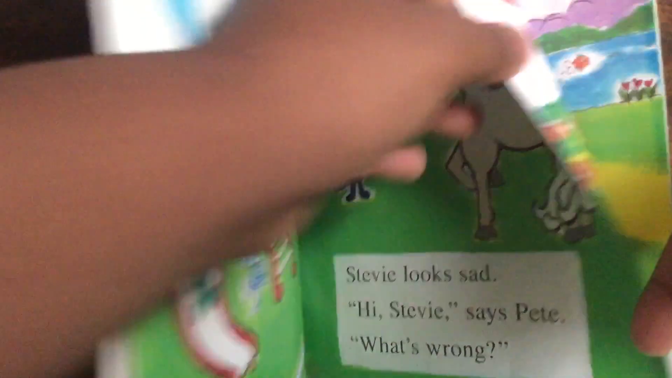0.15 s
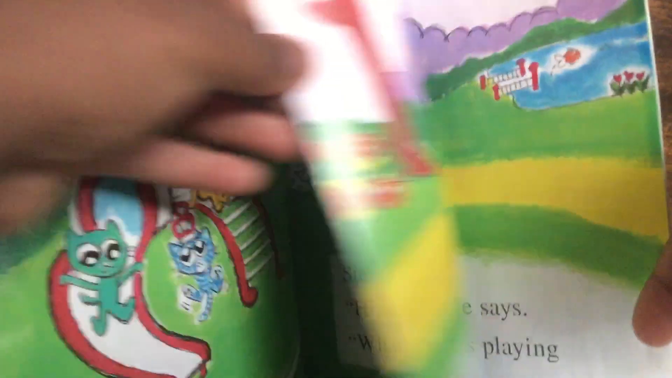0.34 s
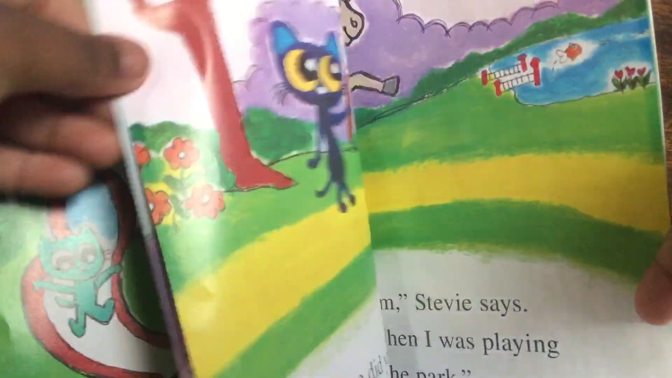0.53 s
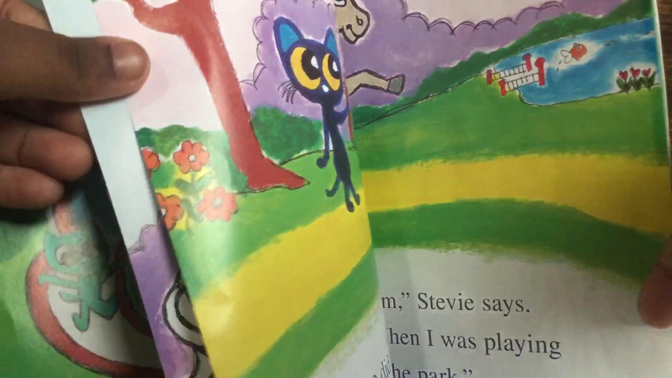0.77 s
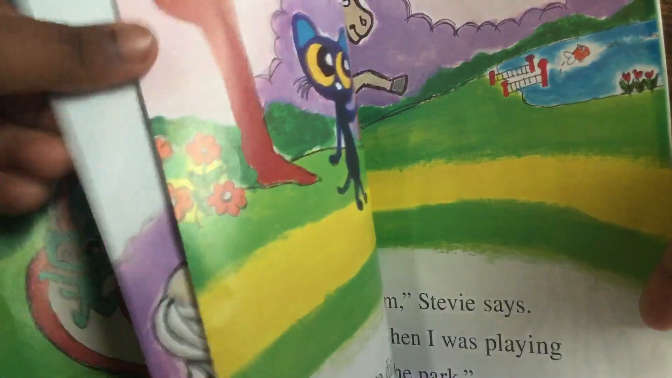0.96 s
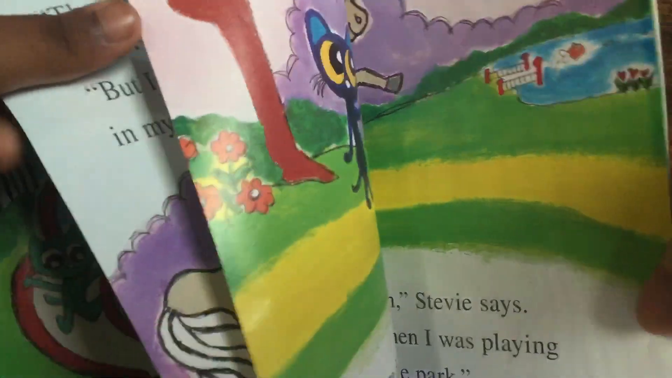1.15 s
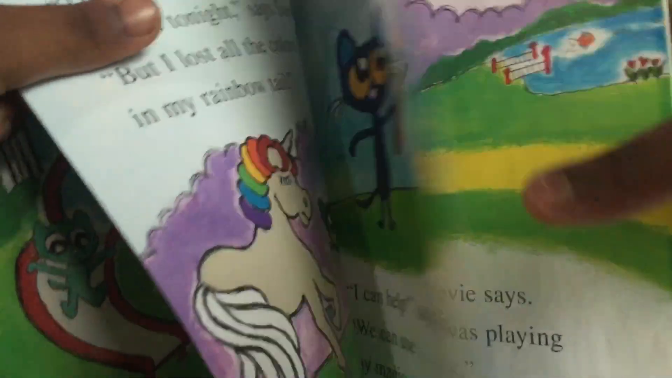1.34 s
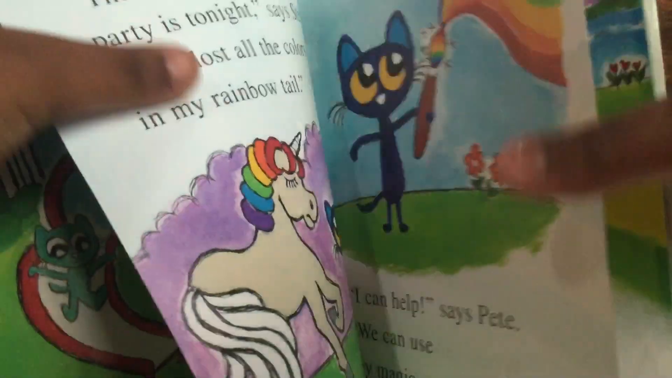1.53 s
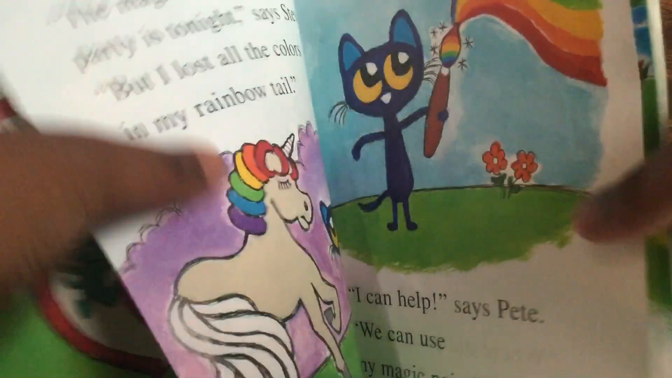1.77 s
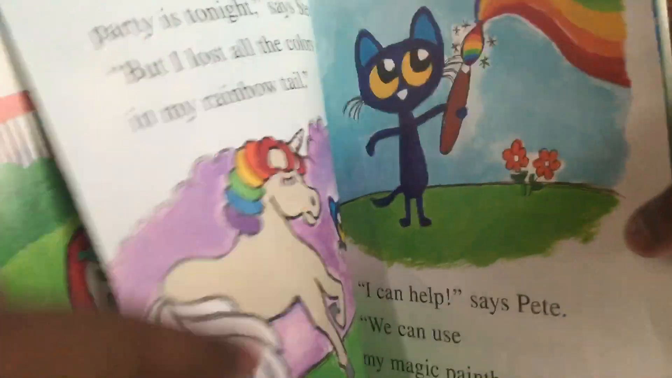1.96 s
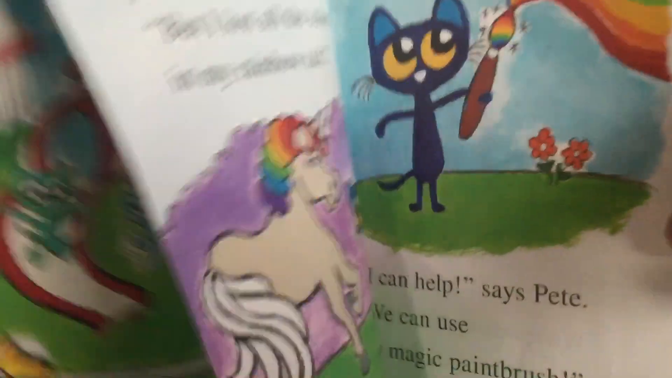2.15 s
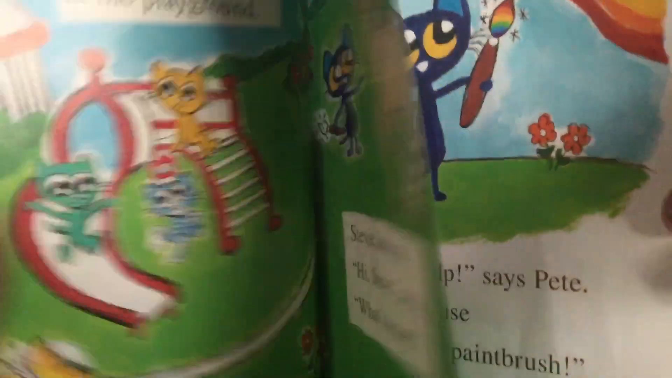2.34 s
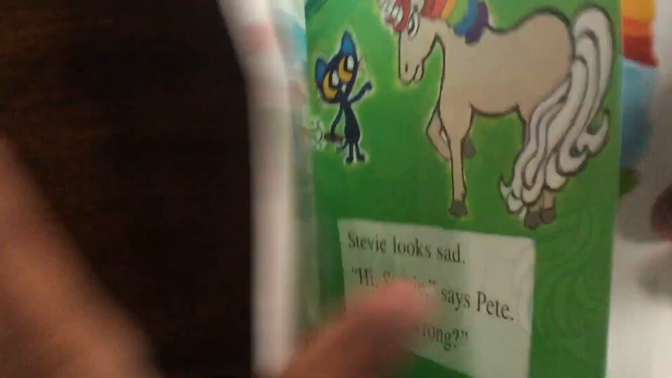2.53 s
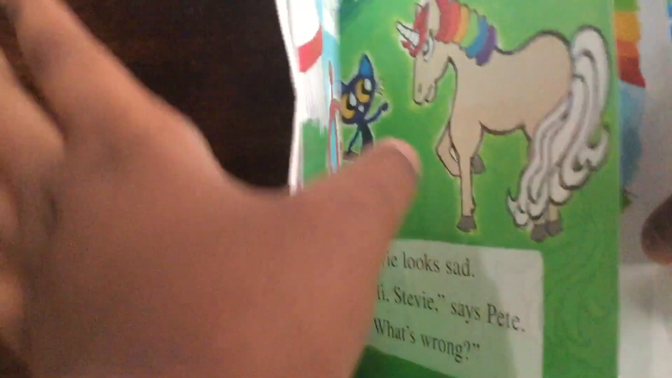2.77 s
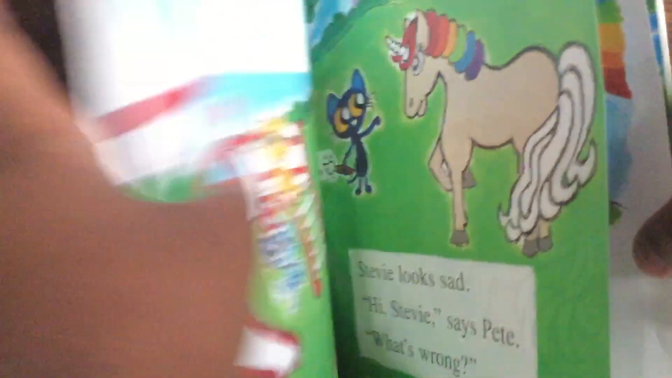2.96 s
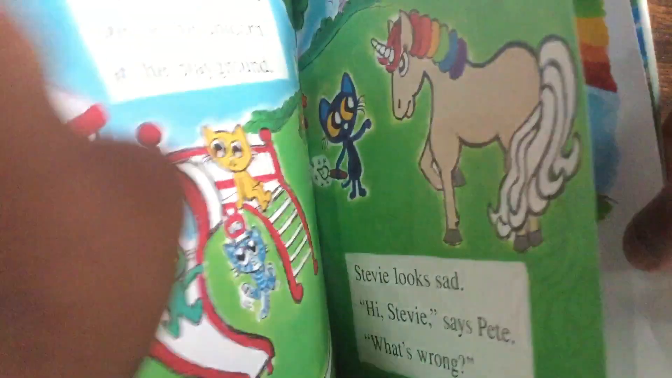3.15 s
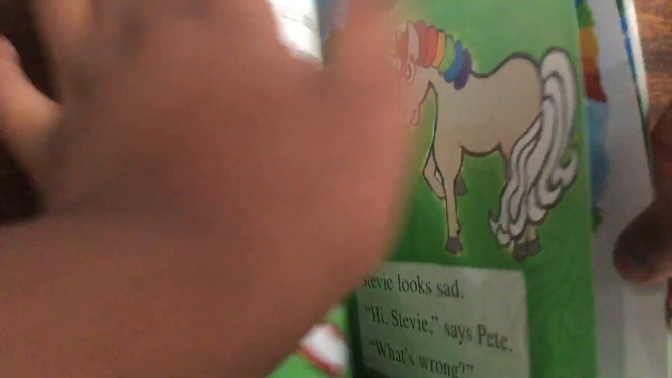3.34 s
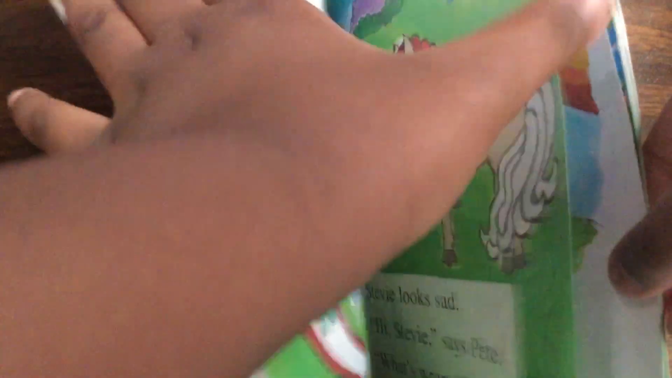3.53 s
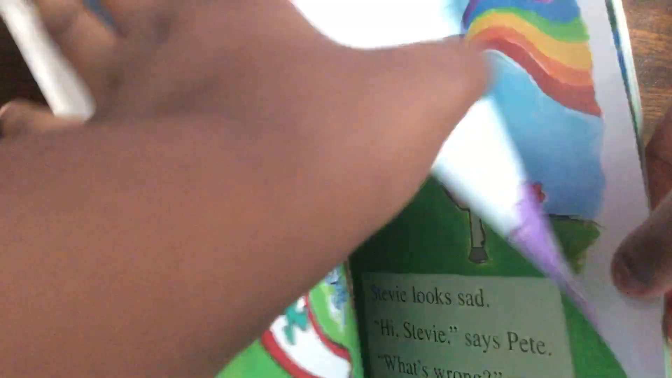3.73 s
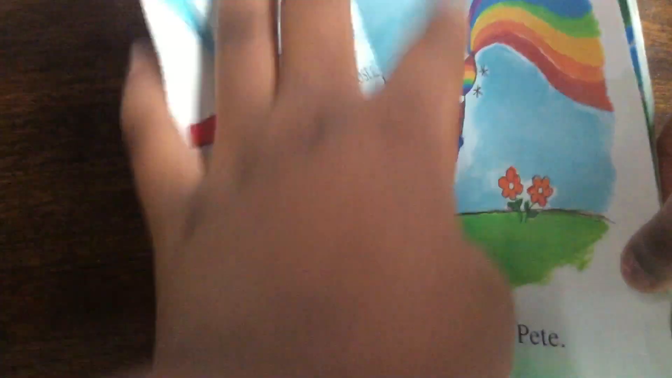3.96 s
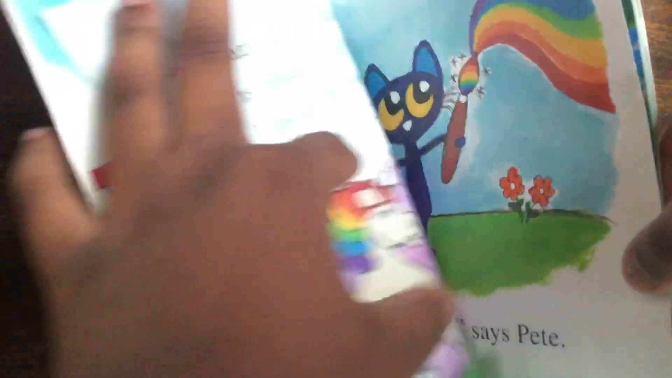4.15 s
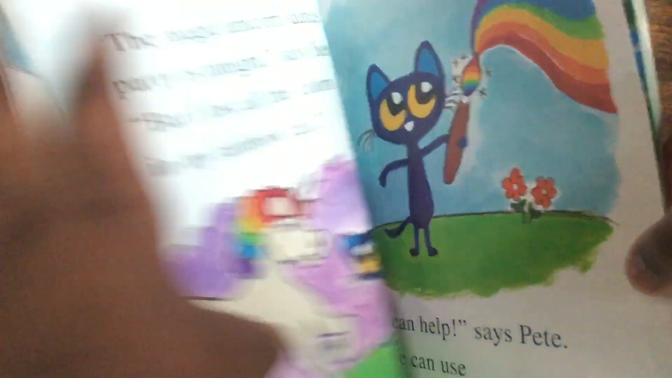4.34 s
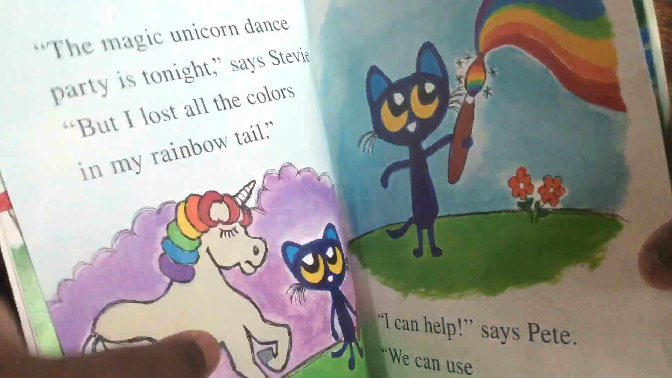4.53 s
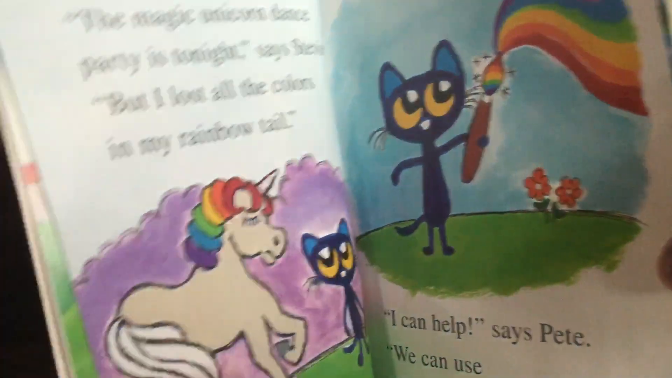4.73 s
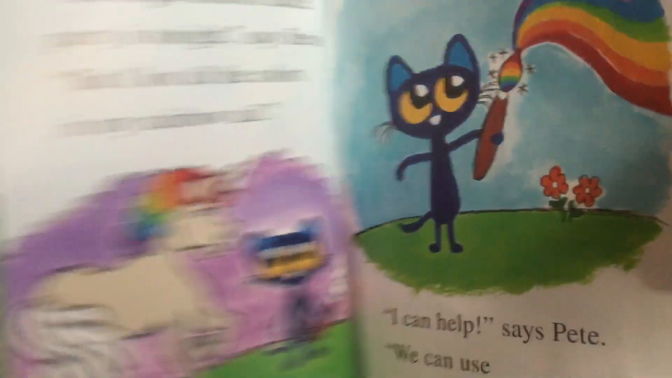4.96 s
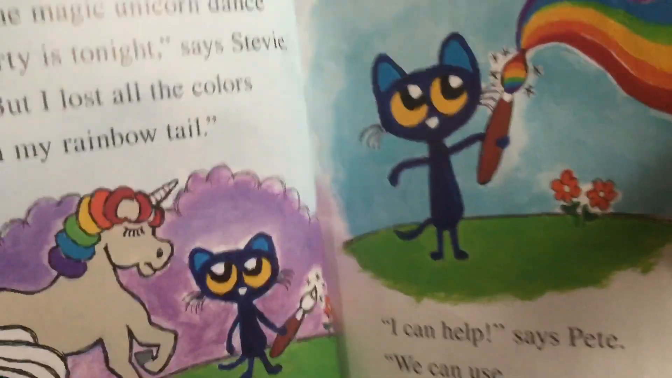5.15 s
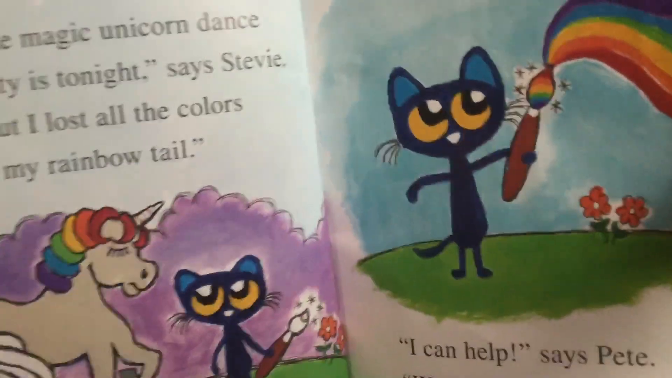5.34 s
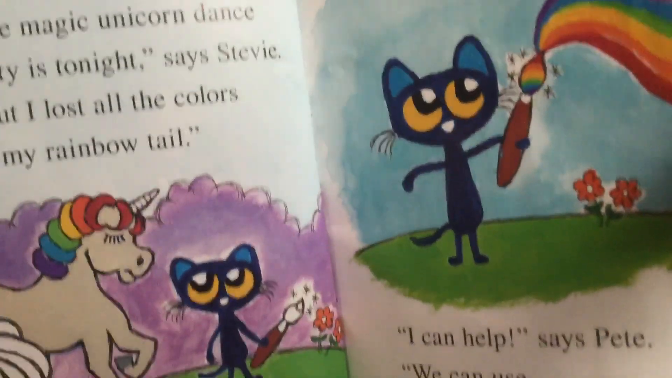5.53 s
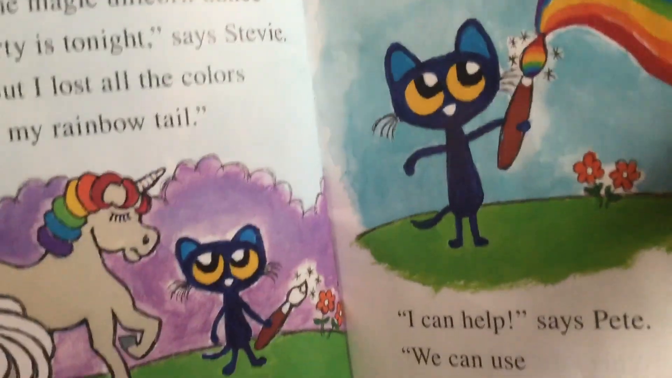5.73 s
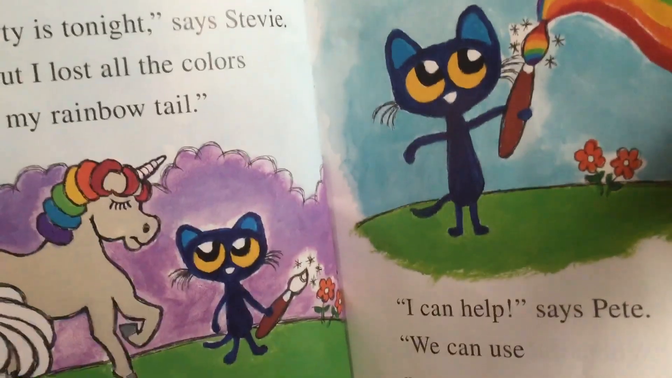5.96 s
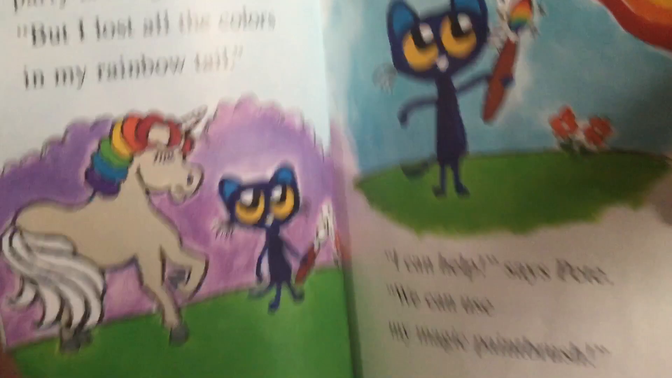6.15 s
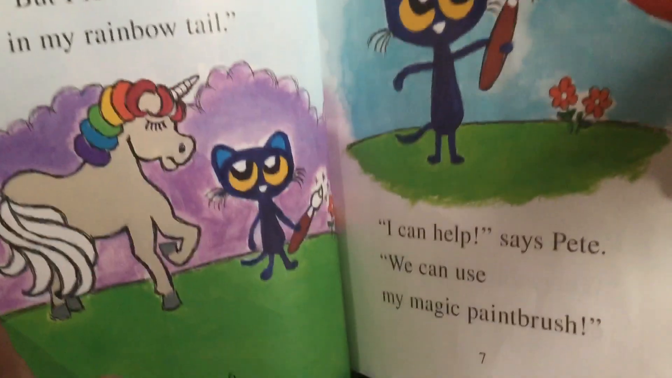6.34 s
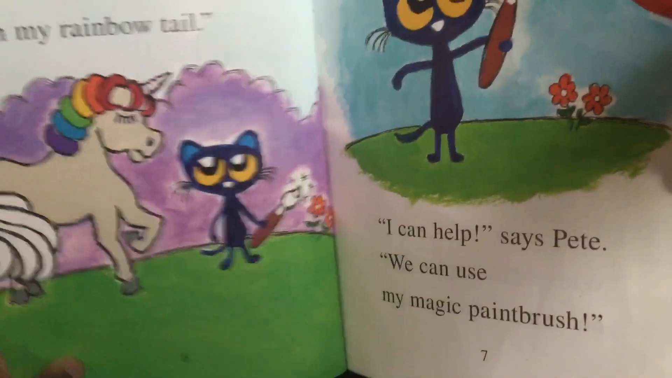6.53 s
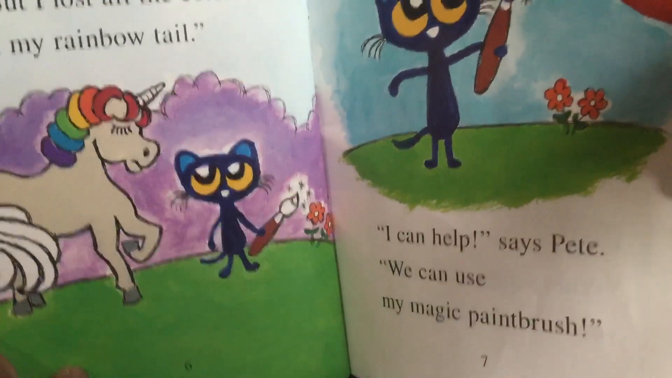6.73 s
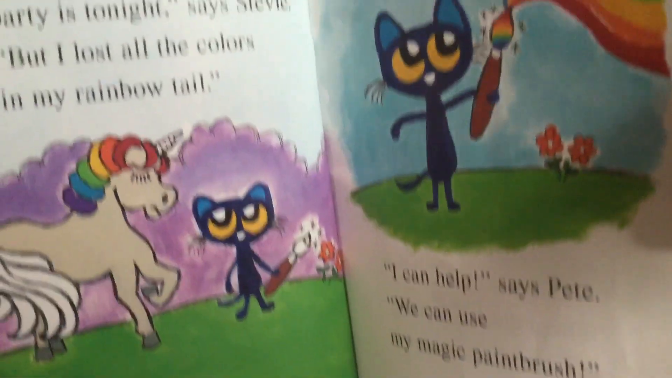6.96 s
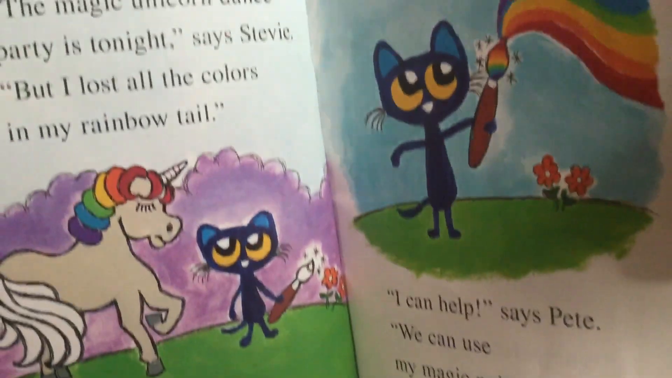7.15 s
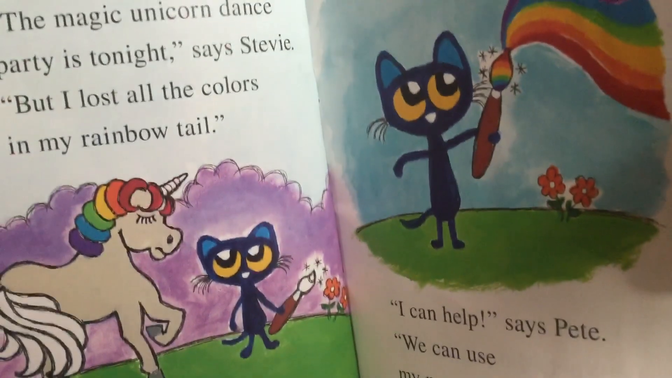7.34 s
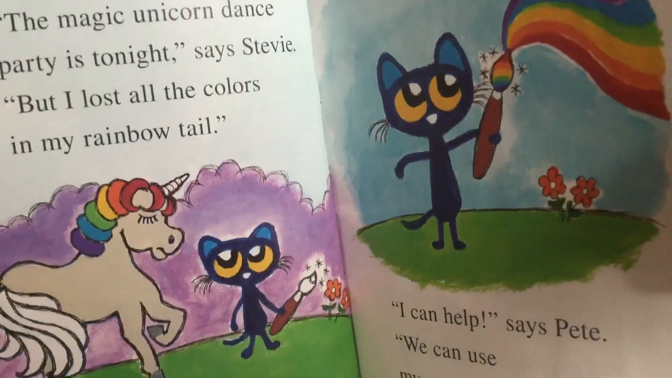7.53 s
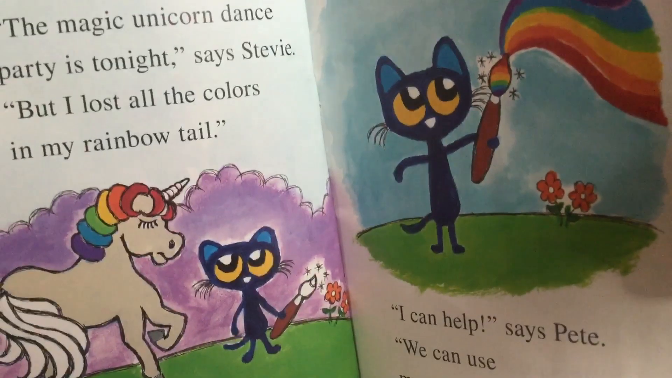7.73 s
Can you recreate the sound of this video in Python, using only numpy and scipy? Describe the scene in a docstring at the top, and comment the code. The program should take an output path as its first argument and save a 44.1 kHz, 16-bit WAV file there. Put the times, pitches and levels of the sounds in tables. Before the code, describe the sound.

Glossy pages of a thin book are turned by hand up close, with crisp snaps, papery swishes and soft table bumps in a quiet room.

```python
"""Glossy pages of a thin book are turned by hand close to a mono microphone in a quiet room.
From the start: a steady hush, air and table rumble, faint rubbing (filtered noise).
From 0.02 s fingers and sheets slide and hiss in strokes (flickering noise under gain curves).
From 0.18 s page edges snap free (noise bursts) and the book bumps the table (knock plus damped modes).
From 0.63 to 1.74 s four short creaks (sine pulses); the last snap is at 6.8 s, the last slide fades by 7.5 s."""
import sys
import numpy as np
from scipy import signal
from scipy.fft import rfft, irfft, next_fast_len
from scipy.io import wavfile
from scipy.ndimage import uniform_filter1d, map_coordinates

SR = 44100
rng = np.random.default_rng(int(sys.argv[2]) if len(sys.argv) > 2 else 0)


def unload_wav(signal):
    """Save mono or channel-first audio to the path in sys.argv[1] as 16-bit WAV at rate SR, clipped to [-1, 1]."""
    wavfile.write(
        sys.argv[1],
        SR,
        np.round(np.clip(np.atleast_2d(signal).T, -1, 1) * 32767).astype(np.int16),
    )


N = 343551

# Spectra, relative power density: freq_hz, level_db
# Room and microphone hush
HUSH_SPECTRUM = [(240, -40), (400, -20), (676, 3.5), (777, -37), (949, 2), (1350, -1), (1870, -2.5),
                 (1960, -3.5), (4050, -9.5), (16000, -57)]
# Pushed air and shaken table
RUMBLE_SPECTRUM = [(15, -33), (25, -1.5), (92, 1.5), (156, -4), (188, -5.5), (272, -7.5), (296, -15.5),
                   (480, -22), (620, -60), (1060, -120)]
# Five colours of the rubbing
HISS_SPECTRUM = [(2060, -66), (3500, -10.5), (5340, 6), (6130, 4), (6880, 4.5), (7930, 3.5), (8820, 2),
                 (10500, -14.5), (13600, -78), (22000, -120)]
LOW_RUB_SPECTRUM = [(200, -9), (330, -2), (450, -12.5), (640, -1.5), (1000, 0.5), (1250, -23), (1700, -102)]
HIGH_RUB_SPECTRUM = [(950, -14), (1250, -3), (1550, -1.5), (2150, -4.5), (2700, -14)]
EDGE_SPECTRUM = [(1800, -46), (2300, -1), (3000, 9), (4200, 4), (5000, -1.5)]
SHEEN_SPECTRUM = [(5290, -80), (9000, -1.5), (10400, -1.5), (12800, 1.5), (14800, -2), (16000, -23)]
# Air and table rumble: time_s, level_db
RUMBLE_LEVELS = [(0.0, -59), (0.28, -64), (0.41, -56.5), (1.63, -57.5), (2.65, -59), (2.95, -58),
                 (3.27, -59.5), (5.73, -61), (6.27, -59), (7.79, -61)]
# Rubbing between strokes, hands never quite off the paper: level_db of hiss, low rub, high rub, edge, sheen
REST_LEVELS_DB = [-77, -74, -89, -78.5, -84]
# Sliding fingers or sheets: start_s, swell_s, hold_s, fade_s, hiss_db,
# then low_rub_db, high_rub_db, edge_db, sheen_db, each relative to hiss_db
STROKES = [(.02, 0.022, 0.035, 0.034, -51, -25, -14, -16.5, -7),
           (0.168, 0.0099, 0.12, .02, -55, -21, -5.5, -7.5, -13),
           (0.292, 0.039, 0.064, 0.24, -45, -10.5, -6.5, -6.5, -13),
           (.52, 0.022, 0.042, 0.028, -44.5, -14, -11, -8.5, -9.5),
           (.6, 0.014, .12, 0.022, -58, -3.5, -7, -6.5, -6),
           (.74, 0.0066, 0.079, 0.026, -66, 5, -3, -2, -11), (.84, .01, 0.037, .02, -60.5, -4, -3, -1, -8),
           (.9, 0.032, 0.075, 0.016, -53, -6, -3, -8, -6), (.955, 0.014, 0.037, .02, -63, -12, -7, -6, -1),
           (1.0, .01, 0.091, .02, -61, -5, -0.5, -2.5, -13),
           (1.11, 0.0089, 0.24, .05, -67.5, -8, 0, -1, -12),
           (1.36, .05, 0.29, .03, -58.5, -13, -7, -16, -10),
           (1.622, 0.055, 0.0078, 0.12, -48.5, -10, -4.5, -9, -11.5),
           (1.72, 0.14, 0.022, 0.17, -45.5, -7.5, -8.5, -7, -7),
           (1.94, .11, 0.0091, 0.14, -44.5, -10.5, -7.5, -8.5, -17),
           (2.078, 0.0053, 0.0094, 0.024, -60.5, 20.5, 12, -7, 0),
           (2.134, 0.013, 0.014, 0.059, -61.5, -1.5, 2, -7, 0),
           (2.2, 0.018, 0.078, 0.067, -52, -7, -6, -6, -6.5),
           (2.35, 0.0092, 0.015, 0.077, -70, 10.5, 2, -15, -8),
           (2.3, 0.022, 0.024, 0.012, -61.5, -5, -13, -22, 4),
           (2.47, 0.028, 0.073, 0.018, -81, -3, 2, -4, -6), (2.56, 0.11, .01, 0.13, -48, -8, -13, -10, -12),
           (2.74, .02, 0.052, 0.038, -65, -8, -13, -9, -8), (2.95, 0.0082, 0.048, 0.024, -65, 3, 2, 5, -11),
           (3.001, 0.062, 0.035, .02, -49, -2, -3.5, -3, -14),
           (3.1, 0.012, 0.025, 0.22, -59, -4, -3, 0, -13), (3.255, .012, 0.22, .02, -63, 1, -0.5, -1, -12),
           (3.519, 0.019, 0.018, 0.13, -50.5, -1, -4, -5, -18),
           (3.569, .13, 0.018, 0.033, -50.5, -15, -3, -1, -12),
           (3.74, 0.0084, 0.013, 0.023, -71, 11, 9, 4, -13),
           (3.78, 0.013, 0.16, 0.11, -49.5, -14.5, -6, -10, -10),
           (3.97, 0.056, 0.097, 0.028, -58, -3.5, 6.5, -7.5, -12),
           (4.128, 0.035, 0.066, 0.054, -43.5, -11.5, -8.5, -7.5, -7),
           (4.235, 0.024, .24, 0.056, -45.5, -9.5, -5.5, -7.5, -2),
           (4.24, 0.11, 0.054, 0.1, -37, -16.5, -8.5, -13, -6),
           (4.6, 0.022, 0.046, 0.054, -61, -1.5, -5, -11, -11),
           (4.62, .16, 0.013, 0.055, -46, -10, -9.5, -13, -3.5),
           (4.818, 0.12, 0.11, 0.055, -35.5, -10, -15, -12.5, -11),
           (5.06, 0.04, 0.083, 0.061, -61.5, -9, -8, -11.5, -20),
           (5.148, 0.12, 0.0079, 0.15, -45, -2.5, -11, -9.5, -8),
           (5.33, 0.013, 0.08, 0.19, -61, -10, -39.5, -21, -9),
           (5.58, .09, .01, 0.078, -74, 5, -6, -11, -4),
           (5.961, 0.14, .09, .095, -48.5, -3, -2.5, -7.5, -3),
           (6.25, .03, 0.055, 0.067, -61.5, -0.5, -2, -7, -7),
           (6.352, 0.13, 0.0091, 0.078, -47, -1, -5, -10.5, -5),
           (6.8, 0.15, 0.034, 0.051, -68, -5, 0, -9, -13),
           (7.12, 0.048, 0.013, 0.3, -69.5, -20, -11, -1.5, -15)]
# Page edges snapping free: time_s, level_db (before trim), dull_db (re bright), bright_hz, dull_hz,
# scuff_db (re crack), scuff_s (to 1/e)
SNAPS = [(0.177, -27.5, -3.5, 5000, 2000, 11, 0.0083), (0.305, -41, 6, 5340, 1020, 4, .012),
         (0.355, -25.5, 6, 3570, 1450, -24, .006), (.6225, -34.5, -7, 4870, 977, 2.5, 0.017),
         (0.665, -34, 8, 3000, 2530, -2, 0.018), (0.7477, -30.5, -3, 4730, 2190, 2.5, 0.023),
         (.839, -18.5, -4.5, 4950, 1060, -10.5, .019), (0.895, -19.5, -1.5, 5000, 1030, -12, 0.022),
         (0.927, -23.5, -2.5, 4700, 1770, -16, 0.023), (.9832, -23, -16, 6850, 1130, -4, .023),
         (1.0026, -24, -9.5, 6150, 732, -21, 0.0064), (1.1095, -42, 7, 5060, 1360, 2, 0.011),
         (1.1714, -37, -9, 4500, 1010, 2, 0.0097), (1.306, -29, -28, 8800, 891, -29, .008),
         (1.3184, -35.5, -13.5, 3800, 883, -21, .01), (1.345, -42, 3.5, 9050, 603, -14, 0.032),
         (1.636, -38.5, 2.5, 7320, 1500, -8, .012), (1.716, -49, 4.5, 4000, 700, -20, 0.009),
         (1.792, -45.5, 9.5, 4000, 700, -3, .01), (1.906, -39.5, 5, 7880, 1310, -13, .01),
         (2.0632, -18.5, -9.5, 5270, 1350, 3.5, 0.0071), (2.0745, -23.5, 2.5, 3520, 1370, -6, 0.0098),
         (2.153, -47, 12, 4410, 970, -2, 0.0091), (2.2, -42.5, 15, 5370, 1310, -18, 0.015),
         (2.3466, -36, 11, 4000, 860, -20, .009), (2.564, -43.5, -3.5, 6850, 939, 2, 0.012),
         (2.63, -44, -12, 4180, 991, 1, 0.023), (2.739, -46, 7, 4530, 1030, -4, 0.016),
         (2.948, -41, 2, 3520, 1000, -5, .004), (2.9546, -30, 0.5, 5430, 960, -2.5, .008),
         (3.261, -43, -17, 7500, 1000, -13, .008), (3.462, -48, 3, 2740, 926, 1, .014),
         (3.487, -44, -9, 5970, 1000, -10, 0.0072), (3.5352, -28, 5, 6602, 630, -10, 0.018),
         (3.5391, -33.5, 3.5, 6000, 1060, 3.5, .015), (3.7825, -42, 1, 3560, 1350, -9, .01),
         (3.9593, -42.5, 14, 4770, 1460, -15, .012), (4.0967, -34, 3, 5600, 1520, -15, .012),
         (4.245, -33, 11, 3570, 1420, -12, 0.017), (4.254, -20, 0.5, 7100, 1330, -6.5, 0.024),
         (4.517, -38, 3.5, 8200, 611, -13, 0.014), (4.611, -44.5, 7, 3238, 818, -18, .01),
         (5.106, -36, -11, 6400, 600, -10, 0.026), (5.2966, -28.5, -2.5, 5350, 1100, -19, .011),
         (5.4, -40, -8, 6860, 708, -14, .012), (5.695, -40, -8, 3000, 2180, -11, .012),
         (5.7673, -41, -8, 4960, 791, -3, 0.0069), (6.1386, -37, 6.5, 3000, 1900, -19, .006),
         (6.398, -38.5, -1, 6200, 920, -21, .012), (6.533, -35.5, -30, 6600, 966, -28, .01),
         (6.538, -30, -29, 4530, 966, -17, 0.017), (6.8, -50.5, -5, 4850, 1040, -6, .01)]
# Book and fingertips on the table: time_s, level_db (before trim), knock_db (re ring, before trim),
# knock_hz, hardness_db_per_octave (re 200 Hz)
BUMPS = [(.177, -48.5, 22.5, 1530, 5), (.266, -39, 1, 680, -4.5), (.356, -53.5, 29, 1460, 19),
         (.638, -48.5, -2, 649, 10), (.839, -54, 15, 1020, 18), (0.894, -42, -18, 1020, 1),
         (0.928, -49.5, -4.5, 1370, 16.5), (1.85, -45, -7, 900, -5), (1.908, -57, -9, 900, -3),
         (2.071, -39, -9, 1400, -3), (2.347, -29, 5, 815, -1.5), (2.385, -49, -14, 800, -2.5),
         (2.621, -32, -1, 970, -2.5), (2.742, -37, 2, 960, -2.5), (2.955, -45.5, -19, 1010, 11),
         (3.29, -42, 6, 730, -1), (3.469, -56, 20.5, 960, 8), (3.535, -64, 25, 1140, 12),
         (4.095, -49, -14, 1030, 10), (4.239, -42.5, 5, 1380, -3), (4.518, -52, 5, 608, 7),
         (5.402, -49.5, 3, 708, 0), (5.44, -59, 11, 974, -4), (5.461, -59, 13, 762, -1),
         (5.481, -58.5, 19, 790, 0), (5.733, -62.5, 15, 607, -6), (6.137, -27, 10, 930, -0.5),
         (6.595, -53.5, 3.5, 692, -6)]
# Modes of the table top: freq_hz, level_db, t60_s (before hand damping)
TABLE_MODES = [(86, 7, 0.067), (131.8, 1, 0.2), (182.4, 6.5, 0.069), (280, 0, 0.14), (345.4, 0.5, 0.082)]
# Bent sheet or spine singing: middle_s, peak_db, pitch_hz, half_length_s (to 1/e)
CREAKS = [(0.626, -38, 188, 0.012), (1.081, -33, 1360, 0.0012), (1.175, -51, 1020, 0.0084),
          (1.742, -43.5, 1680, 0.0031)]

PUSH_DB = -31.5  # air pushed by a stroke, re its hiss
SWELL_POWER, FADE_POWER = 1.27, 2.19  # powers of time
CRINKLES_PER_S, CRINKLE_DB, CRINKLE_DECAY_S = 80, -3, .001  # rate before its wobble; flare of a kick of 1
SNAP_RISE_S, SCUFF_LEAD_S = 0.00071, .0015  # crack rise; scuff starts this long before the crack
HAND_DAMPING = 1.25  # resting hands divide the ring's t60 by this
TOP_HZ = 15900  # band limit


def amp(db):
    """Gain of a level in dB."""
    return 10 ** (np.asarray(db) / 20)


def unit(x):
    """Scaled to rms 1 along time."""
    return x / np.sqrt(np.mean(x ** 2, axis=-1, keepdims=True) + 1e-20)


def filtered(x, response):
    """x times a response of frequency."""
    m = next_fast_len(x.shape[-1] + 8192)
    return irfft(rfft(x, m) * response(np.fft.rfftfreq(m, 1 / SR)), m)[..., :x.shape[-1]]


def coloured(x, spectrum):
    """x filtered by a spectrum on a log-frequency axis, -120 dB outside; rms not normalized."""
    f, db = np.transpose(spectrum)

    def response(hz):
        return amp(np.interp(np.log(hz + 1), np.log(f + 1), db, left=-120, right=-120))
    return filtered(x, response)


def wobble(knots_per_s):
    """Smooth random curve through normally distributed knots."""
    knots = rng.standard_normal(int(N * knots_per_s / SR) + 4)
    return map_coordinates(knots, [np.arange(N) * knots_per_s / SR])


def add(track, time_s, sound):
    """Lays a sound on the track."""
    track[round(time_s * SR):][:len(sound)] += sound


def stillness():
    """The steady hush of room and microphone."""
    return amp(-70) * unit(coloured(rng.standard_normal(N), HUSH_SPECTRUM))


def rumble(hiss_gain):
    """Moving pages push air and shake the table: wavering low noise, raised by the strokes."""
    low = coloured(rng.standard_normal(N), RUMBLE_SPECTRUM)
    time_s, level_db = np.transpose(RUMBLE_LEVELS)
    stir_gain = amp(np.interp(np.arange(N) / SR, time_s, level_db))
    return (stir_gain + amp(PUSH_DB) * hiss_gain) * unit(low * amp(1.15 * wobble(9.1)))


def stroke_gains():
    """Every stroke swells, holds and fades; one gain curve for each colour of the rubbing."""
    t, gains = np.arange(N) / SR, amp(REST_LEVELS_DB)[:, None]
    for start_s, swell_s, hold_s, fade_s, hiss_db, *over_db in STROKES:
        end_s = start_s + swell_s + hold_s + fade_s
        up = np.clip((t - start_s) / max(swell_s, .002), 0, 1) ** SWELL_POWER
        down = np.clip((end_s - t) / max(fade_s, .002), 0, 1) ** FADE_POWER
        peaks = amp(hiss_db + np.array([0, *over_db]))
        gains = gains + peaks[:, None] * (up * down)
    return gains


def patchy(x, patchy_db):
    """Random gain in patches of time and pitch, as a bending sheet shifts its resonances."""
    z = signal.stft(x, nperseg=512)[2]
    field = uniform_filter1d(rng.standard_normal(z.shape), size=3, axis=0)  # over pitch
    field = uniform_filter1d(field, size=12, axis=1)  # over time
    return signal.istft(z * amp(patchy_db * field / field.std()), nperseg=512)[1][:N]


def crinkles():
    """Now and then the sheet buckles and the slips flare for an instant."""
    chance = CRINKLES_PER_S / SR * amp(4 * wobble(8))
    kicks = (rng.random(N) < chance) * np.minimum(rng.exponential(size=N), 2)
    decay = np.exp(-np.arange(SR // 100) / SR / CRINKLE_DECAY_S)
    return 1 + amp(CRINKLE_DB) * signal.fftconvolve(kicks, decay)[:N]


def sliding(gains):
    """Countless tiny slips excite the sheet; the hand's pressure flutters."""
    slip_sizes = amp(1.6 * np.minimum(rng.exponential(size=N), 4))  # a few are larger
    slips = rng.standard_normal(N) * slip_sizes
    flutter = amp(.7 * wobble(40) + .8 * wobble(180))
    slips = patchy(slips * flutter, patchy_db=3.0) * crinkles()
    # level out over 0.1 s: the strokes alone set the slow level
    slips = slips / np.sqrt(np.abs(uniform_filter1d(slips ** 2, size=SR // 10)))
    colours = [HISS_SPECTRUM, LOW_RUB_SPECTRUM, HIGH_RUB_SPECTRUM, EDGE_SPECTRUM, SHEEN_SPECTRUM]
    return sum(gain * unit(coloured(slips, colour)) for gain, colour in zip(gains, colours))


def hump(noise, centre_hz, fall_db):
    """Noise around a centre pitch, fall_db weaker one octave away."""
    return unit(filtered(noise, lambda hz: amp(-fall_db * np.log2((hz + 1) / centre_hz) ** 2)))


def snaps():
    """A crack of a millisecond or two and a short scuff that stops dead as the edge lets go."""
    track, t = np.zeros(N + SR), np.arange(SR // 8) / SR
    noise = rng.standard_normal((len(SNAPS), 2, len(t)))
    for row, (bright_noise, dull_noise) in zip(SNAPS, noise):
        time_s, level_db, dull_db, bright_hz, dull_hz, scuff_db, scuff_s = row
        late = np.maximum(t - SCUFF_LEAD_S, 0) / SNAP_RISE_S
        crack = late * np.exp(1 - late)
        scuff_shape = np.exp(-(t / max(scuff_s, .001)) ** 3) * (1 - np.exp(-t / 0.005))
        scuff = amp(scuff_db) * scuff_shape
        bright = hump(bright_noise, bright_hz, fall_db=10.0) * (crack + scuff)
        dull = hump(dull_noise, dull_hz, fall_db=4) * (np.sqrt(crack) + 0.65 * scuff)  # low pitches linger
        add(track, time_s - SCUFF_LEAD_S, amp(level_db - 8.5) * (bright + amp(dull_db) * dull))
    return track[:N]


def bumps():
    """A short knock of the cover, then the modes of the table top; hard blows favour the upper modes."""
    track, t = np.zeros(N + SR), np.arange(SR // 4) / SR
    for time_s, level_db, knock_db, knock_hz, hardness_db in BUMPS:
        ring = 0
        for k, (hz, mode_db, t60_s) in enumerate(TABLE_MODES):
            swell = 1 - np.exp(-(t * hz / 0.42) ** 2)  # slow bending waves: low modes arrive last
            start_db = mode_db + hardness_db * np.log2(hz / 200)
            fade = amp(start_db - 60 * t * HAND_DAMPING / t60_s)
            ring = ring + (-1) ** k * swell * fade * np.sin(2 * np.pi * hz * t)  # neighbours start opposed
        cycles = knock_hz * (t - .0015)
        knock = np.exp(-(cycles / 0.54) ** 2) * np.cos(2 * np.pi * cycles)
        add(track, time_s, amp(level_db - 5.5) * (ring + amp(knock_db + 7.0) * knock))
    return track[:N]


def creaks():
    """A bent sheet or the spine sings: brief soft tones that swell and fade."""
    t, track = np.arange(N) / SR, np.zeros(N)
    for middle_s, peak_db, pitch_hz, half_s in CREAKS:
        envelope = amp(peak_db) * np.exp(-((t - middle_s) / half_s) ** 2)
        track += envelope * np.sin(2 * np.pi * pitch_hz * (t - middle_s))
    return track


def room(x):
    """A small furnished room answers briefly and dully: decaying noise, t60 66 ms."""
    t = np.arange(SR // 4) / SR
    dull = filtered(rng.standard_normal(len(t)), lambda hz: 1 / (1 + hz / 4000))
    tail = dull * amp(-60 * t / 0.066)
    return signal.fftconvolve(x, tail / np.linalg.norm(tail))[:N]


def scene():
    """One microphone feeds both channels."""
    gains = stroke_gains()
    near = snaps() + bumps() + creaks() + sliding(gains)
    mono = near + amp(-15.5) * room(near) + rumble(gains[0]) + stillness()
    return np.array([mono, mono])


def record(dry):
    """The small microphone drops the deepest bass and dips near 475 Hz; nothing is kept above TOP_HZ."""
    def response(hz):
        dip = amp(-4 * np.exp(-((hz - 475) / 55) ** 2))
        return (hz < TOP_HZ) * dip / (1 + (42 / (hz + 1)) ** 6)
    return filtered(dry, response)


dry = scene()
out = record(dry)
unload_wav(out)
```